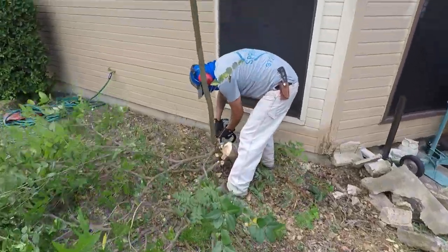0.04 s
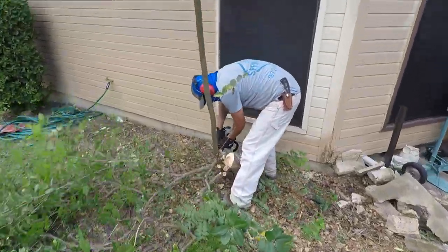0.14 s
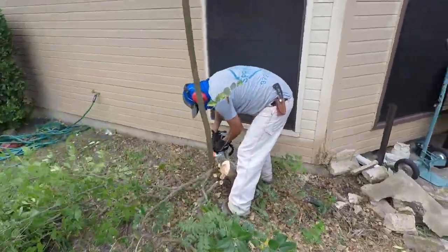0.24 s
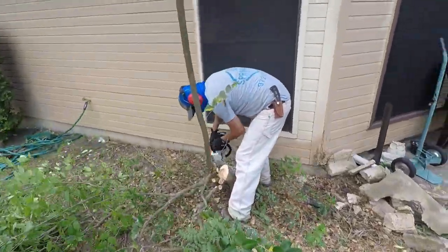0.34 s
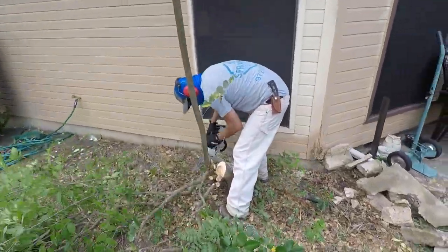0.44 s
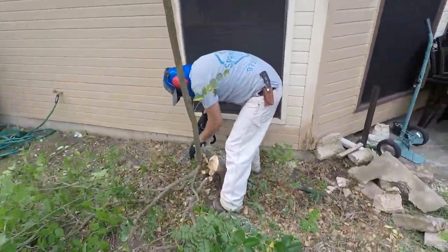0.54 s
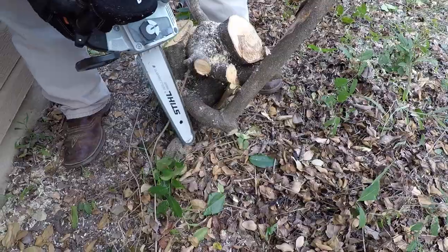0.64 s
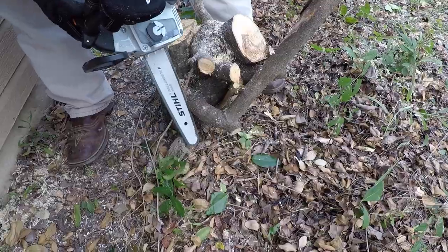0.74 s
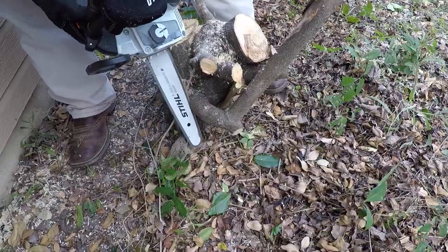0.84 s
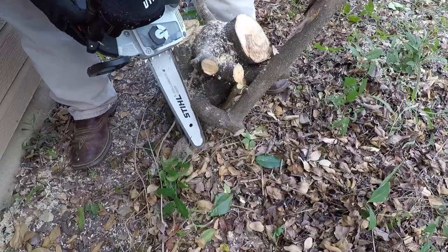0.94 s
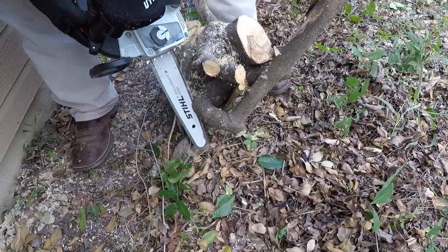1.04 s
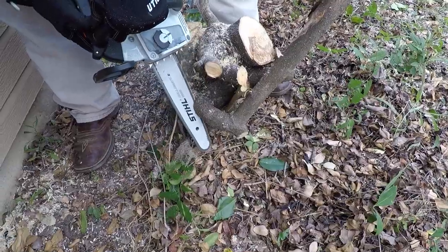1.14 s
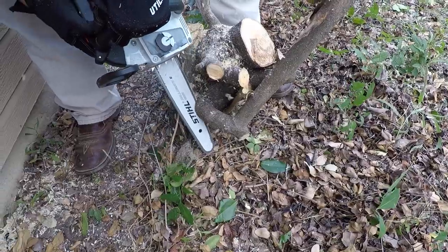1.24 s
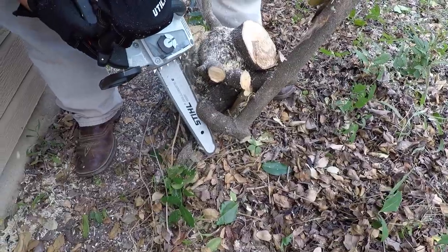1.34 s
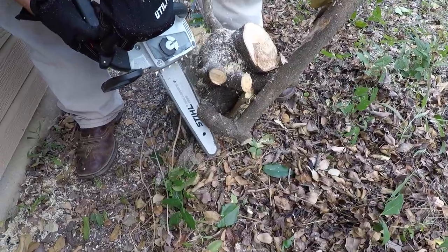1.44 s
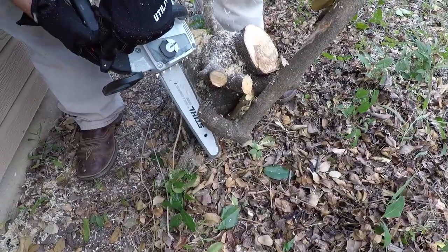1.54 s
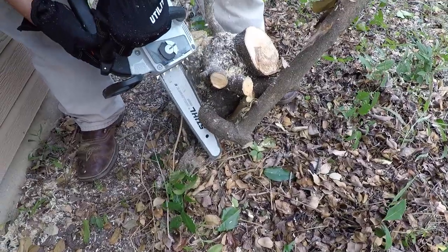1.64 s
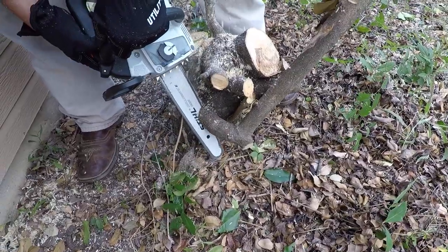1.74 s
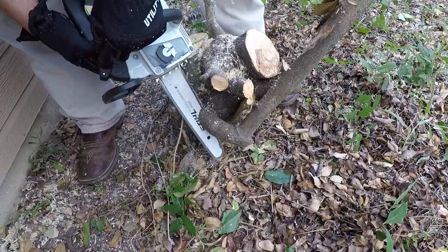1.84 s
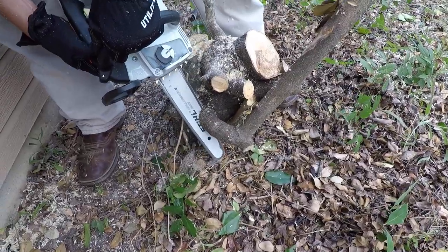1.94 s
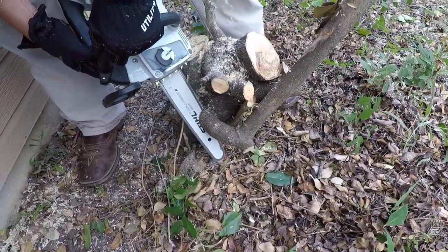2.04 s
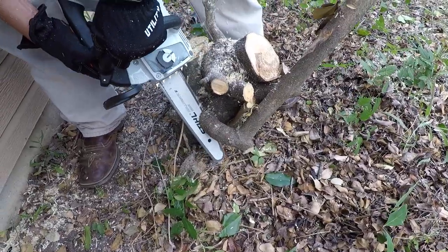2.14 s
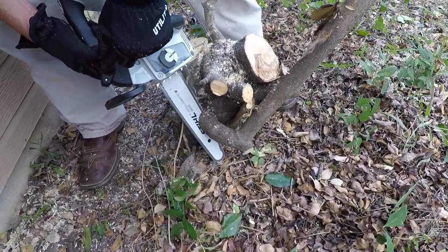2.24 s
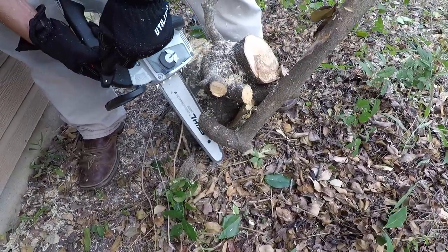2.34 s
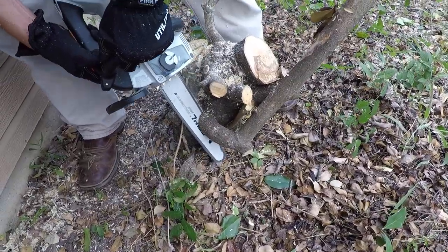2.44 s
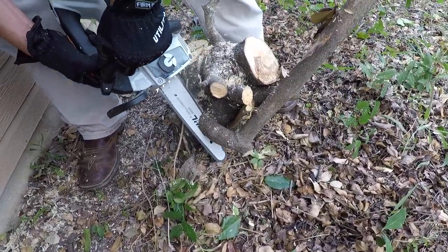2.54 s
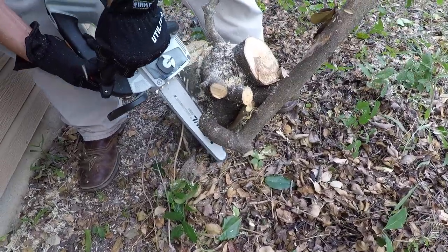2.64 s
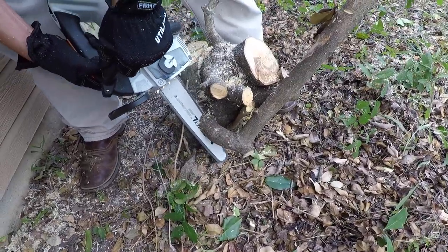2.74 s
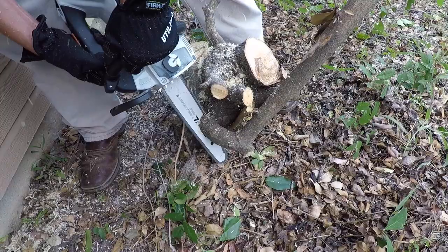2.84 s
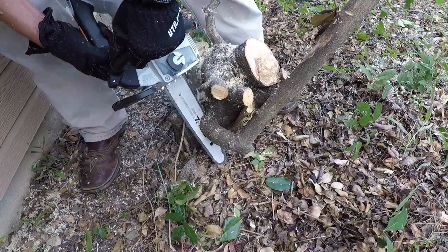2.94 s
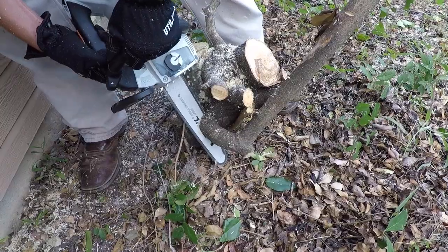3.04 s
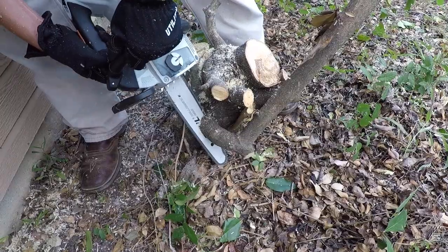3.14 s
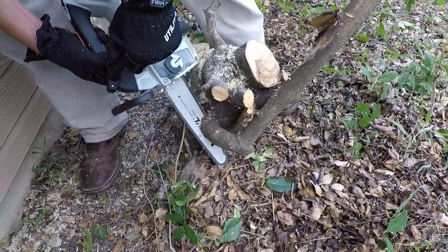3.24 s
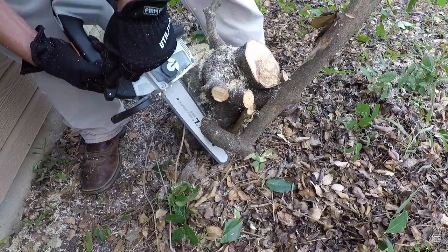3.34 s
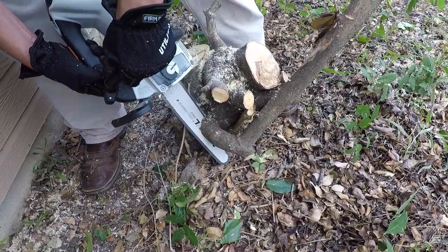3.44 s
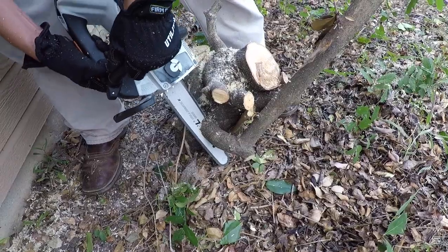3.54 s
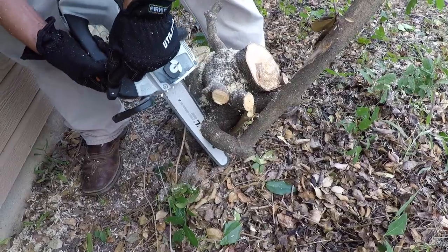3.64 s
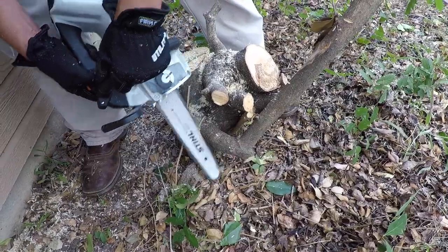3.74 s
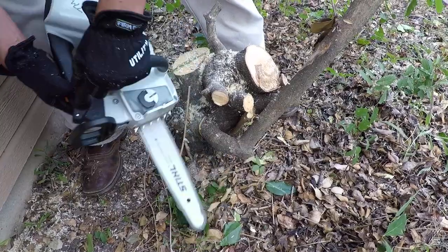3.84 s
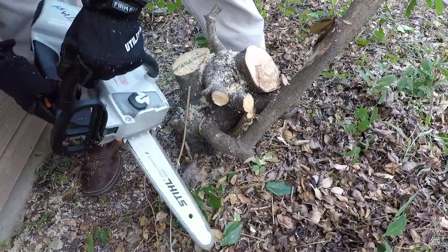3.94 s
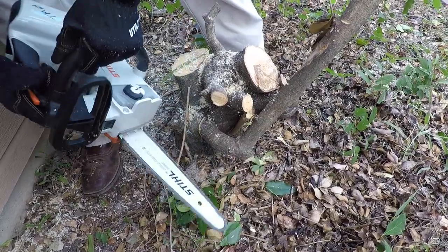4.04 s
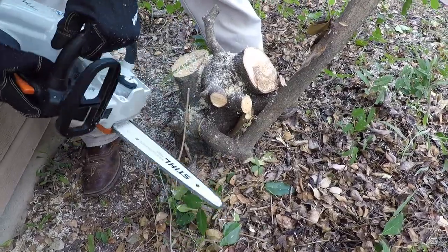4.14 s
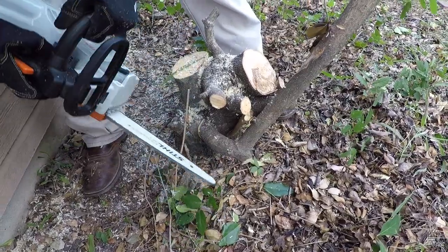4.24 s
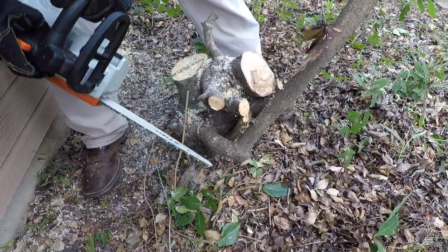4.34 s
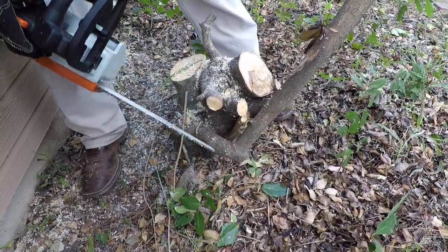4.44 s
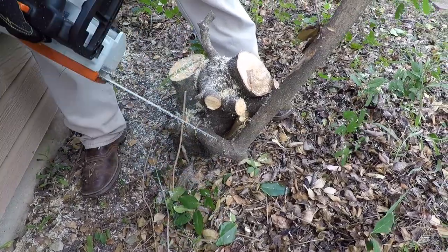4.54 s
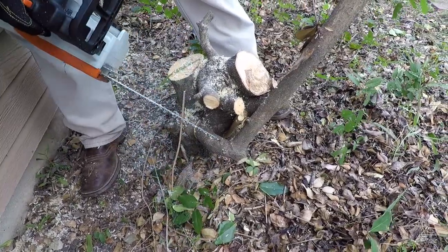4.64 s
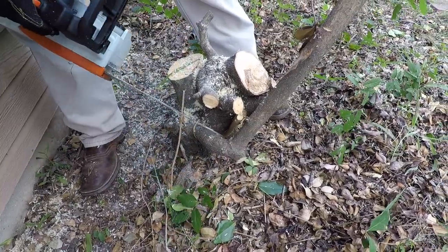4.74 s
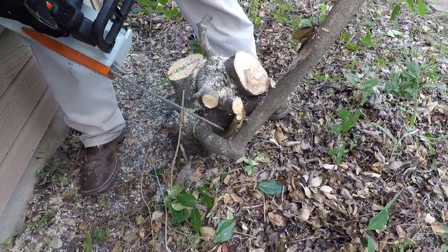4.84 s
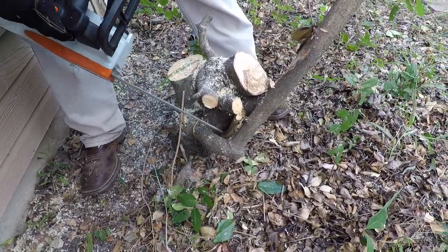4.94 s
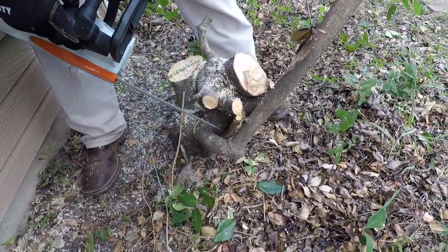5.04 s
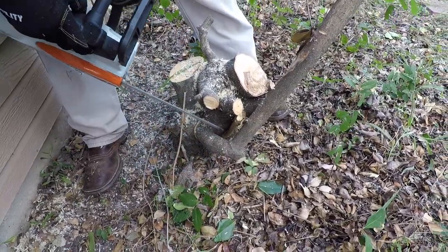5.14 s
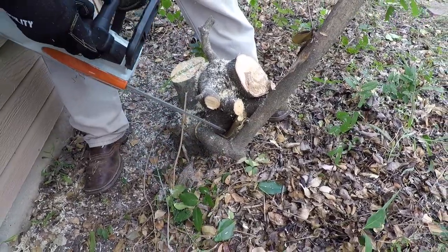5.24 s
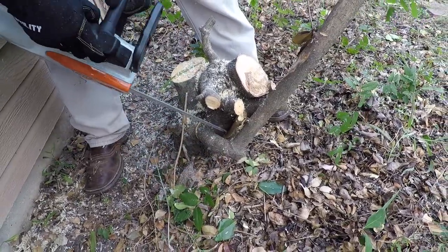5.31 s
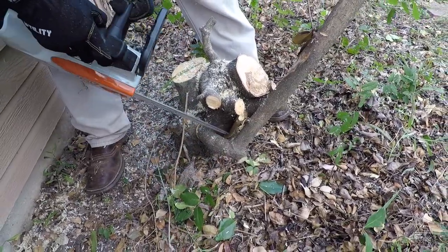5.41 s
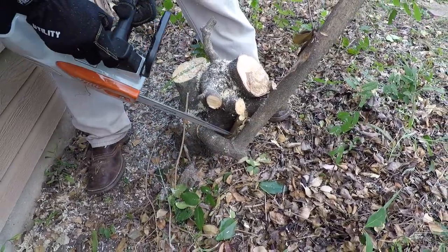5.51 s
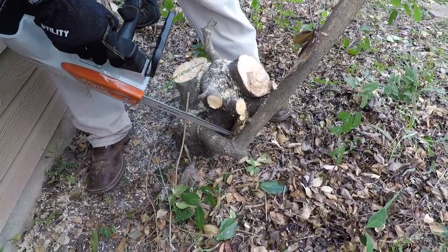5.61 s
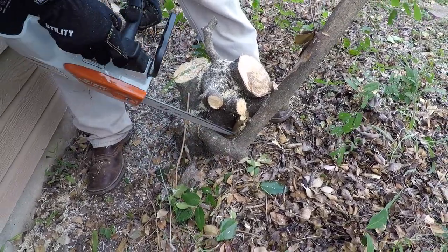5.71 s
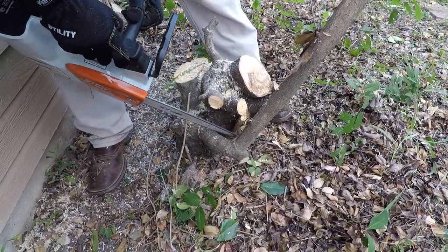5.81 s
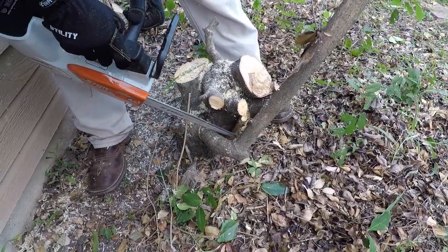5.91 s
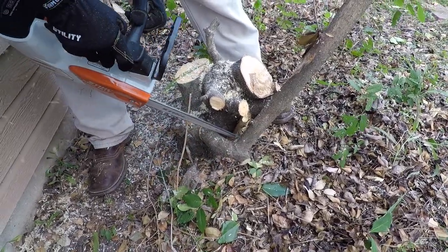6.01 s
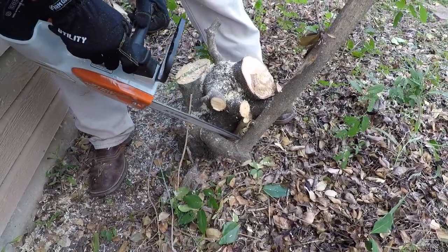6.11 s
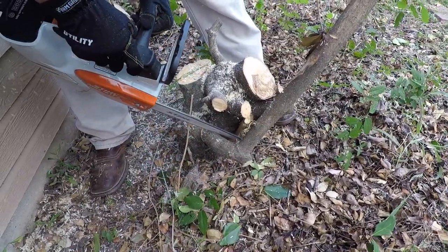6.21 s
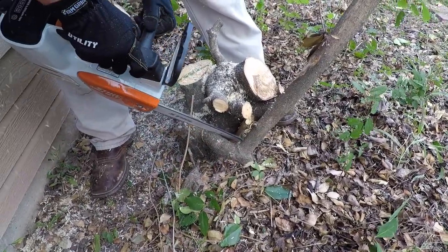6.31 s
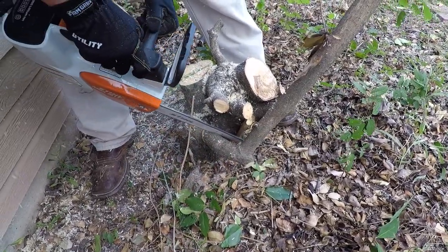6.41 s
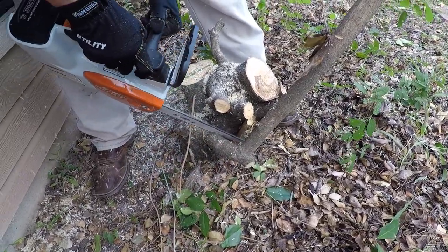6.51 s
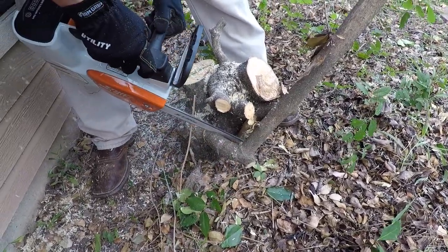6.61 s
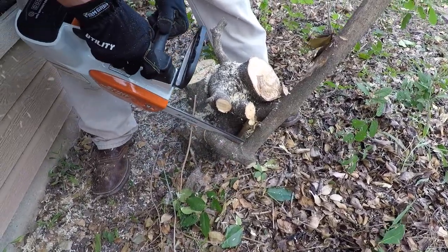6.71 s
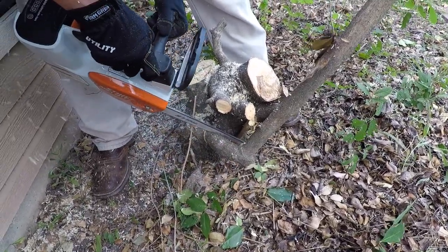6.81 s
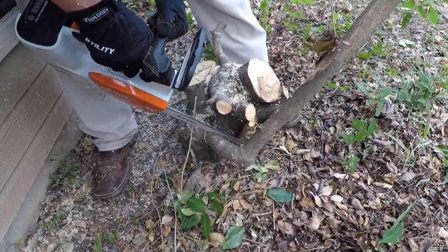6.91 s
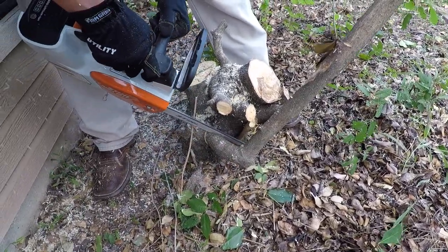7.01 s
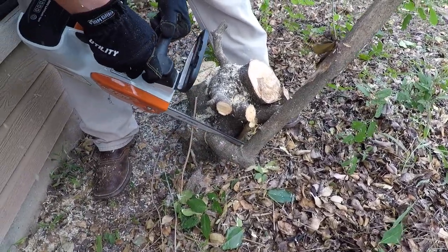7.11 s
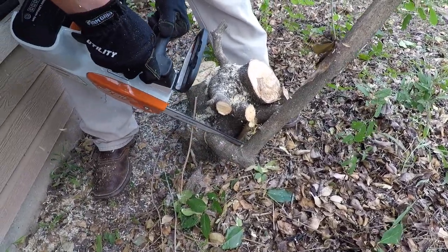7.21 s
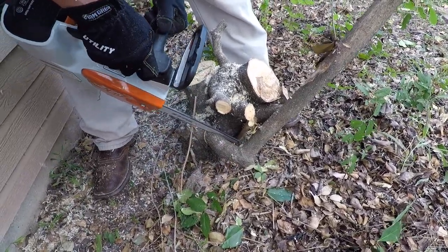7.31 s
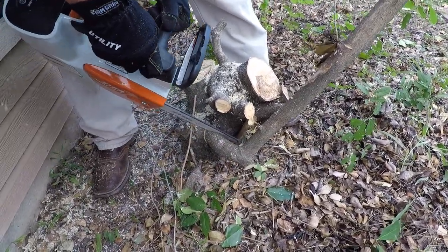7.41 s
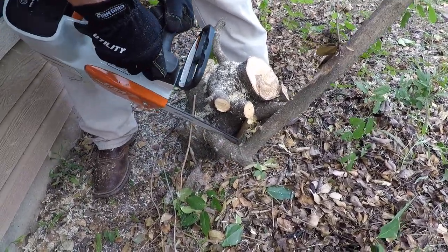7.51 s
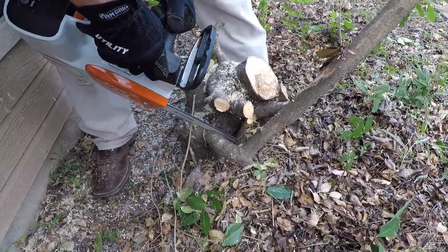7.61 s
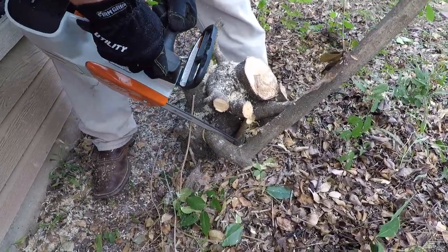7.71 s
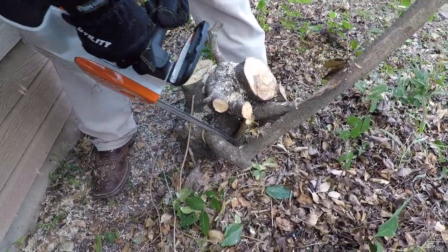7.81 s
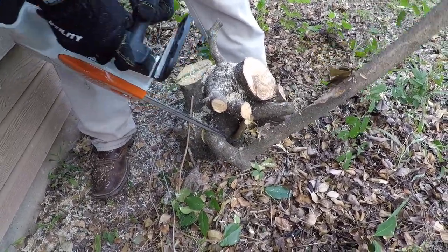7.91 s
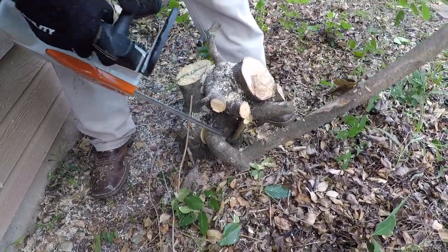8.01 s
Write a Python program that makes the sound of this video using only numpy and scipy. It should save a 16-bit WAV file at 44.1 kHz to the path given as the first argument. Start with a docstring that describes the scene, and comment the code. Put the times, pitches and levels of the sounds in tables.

```python
"""A battery chainsaw cuts wood in a yard, in mono. Three runs: the end of a cut a few metres off in a
breeze, then close by a cut with the bar upright and, after a pause, one with the saw on its side.
An eight-tooth sprocket whines; chain and cutters chatter through housing, bar and wood, with brief
squeals, growls and a low drumming of the wood. Brake, trigger and twigs tick, wood thumps on the ground.
Behind it: a distant wash, insects and machinery hum."""
import sys
import numpy as np
from scipy import signal
from scipy.fft import rfft, irfft
from scipy.io import wavfile
from scipy.ndimage import uniform_filter1d

SR = 44100
rng = np.random.default_rng(int(sys.argv[2]) if len(sys.argv) > 2 else 0)


def generate_wav(sig):
    """Save sig (samples, or channels by samples) to the path in sys.argv[1] as 16-bit PCM at SR."""
    pcm = np.round(np.clip(np.atleast_2d(sig).T, -1, 1) * 32767).astype(np.int16)
    wavfile.write(sys.argv[1], SR, pcm)


N = 355446


def gain_of(db):
    """dB to gain."""
    return 10 ** (np.asarray(db) / 20)


def unit_rms(x):
    """Scale to rms 1."""
    return x / np.sqrt(np.mean(x ** 2) + 1e-20)


def spectrum_db(points, hz):
    """Spectrum table interpolated over log frequency."""
    f, db = np.transpose(points)
    return np.interp(np.log(hz + 1), np.log(f + 1), db)


def follow(rows, t):
    """Columns of a curve table at times t."""
    times, *columns = np.transpose(rows)
    return [np.interp(t, times, column) for column in columns]


def add(mix, start_s, sound):
    """Mix a sound in at start_s."""
    part = mix[max(round(start_s * SR), 0):][:len(sound)]
    part += sound[:len(part)]


def wander(count, hz):
    """Smooth random curve up to about hz, rms 1."""
    lowpass = signal.butter(2, hz, fs=SR, output="sos")
    return unit_rms(signal.sosfilt(lowpass, rng.standard_normal(count + SR))[SR:])


def noise_band(hz, width_hz, db, count=N):
    """Band-passed noise at rms level db."""
    sos = signal.butter(3, (hz - width_hz / 2, hz + width_hz / 2), "bandpass", fs=SR, output="sos")
    return gain_of(db) * unit_rms(signal.sosfilt(sos, rng.standard_normal(count + SR // 4)))[-count:]


def coloured(x, db_of, size=512):
    """Weight the short-time spectrum by db_of(f/Hz, t/s)."""
    frames = dict(fs=SR, nperseg=size, noverlap=size - size // 4)
    hz, t, spectrum = signal.stft(x, **frames)
    return signal.istft(spectrum * gain_of(db_of(hz[:, None], t)), **frames)[1][:len(x)]


# f/Hz, relative level/dB
WASH_SPECTRUM = [(30, -14), (60, 1.5), (150, -10), (220, -11), (450, -9), (700, -6.5), (1200, -18),
                 (4000, -23.5), (8200, -24), (11500, -31), (15500, -36)]


def wash(db=-51):
    """Steady distant noise, mostly low."""
    noise = coloured(rng.standard_normal(N), lambda hz, s: spectrum_db(WASH_SPECTRUM, hz), size=2048)
    return gain_of(db) * unit_rms(noise)


def insects():
    """Far insects: one high band of noise."""
    return noise_band(hz=9750, width_hz=780, db=-54)


# f/Hz, start/s, end/s, level/dB
HUM_TONES = [(77.8, .7, 1.6, -59), (77.8, 3.3, 5.4, -55), (77.8, 4.5, 5.0, -53), (127.6, 1.4, 3.9, -56),
             (175.7, 0, .6, -52), (175.7, .85, 1.65, -52), (234, .65, 1.4, -55), (174.5, 5.6, 6.75, -51),
             (252, 5.5, 6.5, -52), (232.8, 5.9, 6.7, -54)]


def machinery_hum(t, fade_s=0.06):
    """Distant machinery: wavering tones that come and go."""
    out = np.zeros(N)
    for hz, start, end, db in HUM_TONES:
        fade = np.clip(np.minimum(t - start, end - t) / fade_s, 0, 1)
        out += gain_of(db + 1.5 * wander(N, 4.2)) * fade * np.sin(2 * np.pi * hz * t)
    return out


# t/s, level/dB
BREEZE_LEVEL = [(0, -14), (.25, -22.5), (.516, -10), (.6, -19), (.61, -35), (1.1, -49.5), (4.2, -36),
                (5.5, -47.5), (6.2, -36), (7.3, -45), (8.06, -44)]


def breeze(t):
    """Pressure sway near 10 Hz on the microphone, strong in the far run, faint close by."""
    hz = np.fft.rfftfreq(N, 1 / SR)
    sway = irfft(rfft(rng.standard_normal(N)) * (hz / 9) / (1 + (hz / 11) ** 7.7), N)
    return gain_of(follow(BREEZE_LEVEL, t)[0]) * unit_rms(sway)


# t/s, level/dB, f/Hz
WOOD_THUMPS = [(3.145, -37, 90), (7.95, -37, 217)]


def thumps():
    """Wood knocks softly on the ground: one low push each."""
    out, t = np.zeros(N), np.arange(3000) / SR
    envelope = np.e * t / 0.0041 * np.exp(-t / 0.0061)
    for start, db, hz in WOOD_THUMPS:
        add(out, start, gain_of(db) * envelope * np.sin(2 * np.pi * hz * t))
    return out


# t/s, level/dB, f/Hz, t60/s, crack share
TICK_EVENTS = [(0.291, -5, 2700, .03, 0.54), (4.0528, 0, 3000, .008, .1), (4.0526, -6, 3700, .008, .2),
               (4.0542, -9, 2200, .025, .3), (4.049, -8.5, 1200, 0.027, 0.52),
               (4.246, -18, 9000, 0.018, 0.95), (4.288, -36, 1508, .05, 0.71),
               (4.39, -50, 13000, .01, 0.65), (4.417, -54, 7000, .02, .8), (4.44, -45, 13000, .01, .8),
               (4.4538, -21, 4430, .03, 0.68), (4.4574, -11.5, 7860, 0.019, 0.75),
               (4.57, -26.5, 10000, 0.013, 1), (4.6465, -29, 6100, 0.036, .3),
               (4.682, -14, 2800, 0.05, 0.51), (4.733, -4.5, 2940, .03, 0.49), (4.787, -5, 2500, .03, 0.36),
               (6.576, -4, 3550, 0.033, 0.98), (6.592, -14, 3700, .03, .9), (6.644, -7, 3020, 0.029, 1)]


def ticks(attack_s=0.00024):
    """Brake, trigger and twigs: a short ring of plastic or wood with a crack of noise."""
    out, t = np.zeros(N), np.arange(3000) / SR
    for start, db, hz, t60, share in TICK_EVENTS:
        sos = signal.butter(1, (hz / 10, min(hz * 2.1, 19000)), "bandpass", fs=SR, output="sos")
        crack = 0.5 * unit_rms(signal.sosfilt(sos, rng.standard_normal(len(t))))
        ring = np.sin(2 * np.pi * hz * t)
        envelope = gain_of(db - 60 * t / t60) * np.minimum(t / attack_s, 1)
        add(out, start, envelope * ((1 - share) * ring + share * crack))
    return out


# start/s, end/s, f/Hz, width/Hz, level/dB
RESONANCE_SPELLS = [(0.217, .24, 580, 60, -27), (0.229, 0.295, 1530, 90, -27),
                    (0.367, 0.492, 940, 110, -30.5), (0.431, 0.474, 590, 60, -30),
                    (0.61, 1.15, 3740, 140, -36), (1.6, 1.9, 696, 90, -39), (2.05, 2.33, 667, 110, -32.5),
                    (2.28, 2.47, 5960, 700, -25), (2.44, 2.822, 4560, 150, -30),
                    (3.252, 3.75, 4480, 170, -30), (3.851, 4.02, 5220, 260, -31),
                    (3.882, 4.02, 683, 70, -26), (4.07, 4.12, 1550, 100, -28.5),
                    (4.682, 4.736, 1030, 200, -23.5), (4.692, 4.837, 2920, 180, -24),
                    (4.797, 4.963, 3520, 160, -28), (5.15, 5.6, 5330, 250, -38), (5.6, 6.75, 201, 110, -48),
                    (4.7, 5.2, 398, 110, -39), (7.15, 7.6, 11700, 900, -35)]


def resonances():
    """Brief narrow noise bands: high squeals of bar or housing, growls, low drumming of the wood."""
    out = np.zeros(N)
    for start, end, hz, width_hz, db in RESONANCE_SPELLS:
        t = np.arange(start, end, 1 / SR)
        fade = np.clip(np.minimum(t - start, end - t) / (0.18 * (end - start)), 0, 1)
        add(out, start, fade * noise_band(hz, width_hz, db, len(t)))
    return out


# Per-run order throughout: far, upright, on its side.
TEETH, START_S, SPIN_UP_S = 8, 4.683, .12
RELEASE_S, BRAKE_ONSET_S = (.19, 3.95, 7.865), (.01, .04, .008)
BRAKE_HZ_PER_S = (1200, 1900, 3100)
# per run: t/s, tooth rate under power/Hz
POWERED_RATE = [
    [(0, 663), (.12, 650), (.19, 637)],
    [(.62, 623), (.9, 631), (1.05, 629), (1.6, 640), (1.78, 653), (1.92, 641), (2.06, 640), (2.16, 626),
     (2.22, 639), (2.31, 639), (2.39, 597), (2.48, 643), (2.6, 651), (2.67, 638), (2.82, 632), (2.9, 650),
     (3.17, 641), (3.28, 630), (3.45, 638), (3.96, 637)],
    [(4.68, 635), (5.5, 633), (5.9, 629), (6.05, 633), (6.62, 630), (6.8, 653), (7.0, 647), (7.12, 637),
     (7.23, 637), (7.38, 609), (7.55, 655), (7.66, 659), (7.76, 649), (7.86, 626)],
]


def tooth_hz(run, t):
    """Sprocket tooth rate: the last run spins up from rest; each brakes on trigger release."""
    powered = follow(POWERED_RATE[run], t)[0]
    if run == 2:
        powered *= 1 - np.exp(-np.maximum(t - START_S, 0) / SPIN_UP_S)
    released_s = np.maximum(t - RELEASE_S[run], 0)
    braked_s = released_s - BRAKE_ONSET_S[run] * (1 - np.exp(-released_s / BRAKE_ONSET_S[run]))
    return np.maximum(powered - BRAKE_HZ_PER_S[run] * braked_s, 0)


def shaft_angle(run, t):
    """Shaft angle/rad; the speed trembles as cutters bite, more while the chain runs slack."""
    rate_hz = tooth_hz(run, t)
    slack = np.clip(1 - rate_hz / 620, 0, 1)
    tremble = ((.002, .00401, .002)[run] + .015 * slack) * wander(len(t), 41)
    return 2 * np.pi * np.cumsum(rate_hz * (1 + tremble)) / SR / TEETH


# t/s, beat depth in the chatter/dB
BITE_DEPTH = [(0, 0), (.6, 0.5), (2, 0.5), (4, 0.5), (4.8, .5), (5.6, 0.5), (6.2, 1), (6.55, 2), (6.75, 0),
              (7.9, .5)]


def cutter_beat_db(t, angle):
    """Cutters meet the wood about three times in four shaft turns."""
    return follow(BITE_DEPTH, t)[0] * np.cos(.745 * angle + 0.3 * wander(len(t), 8))


# per run: t/s, level/dB; first and last rows bound the run
CHATTER_LEVEL = [
    [(0, -20), (.2, -18.5), (.36, -20), (.42, -24), (.5, -35.5), (.53, -42.5), (.596, -39)],
    [(.6, -17), (1.4, -15.5), (1.6, -16), (2.0, -16.5), (2.4, -17), (2.6, -17.5), (2.8, -17), (3.0, -17.5),
     (3.8, -16.5), (4.08, -19.5), (4.16, -23.5), (4.24, -28.5), (4.275, -59), (4.3, -49), (4.33, -67),
     (4.36, -72)],
    [(4.645, -36), (4.67, -37), (4.7, -21.5), (4.73, -17), (4.8, -14.5), (4.86, -16.5), (5.2, -18),
     (5.5, -17.5), (6.6, -17), (7.0, -19), (7.2, -17.5), (7.6, -19), (7.87, -16), (7.93, -19),
     (7.953, -21.5), (7.965, -29.5), (8.03, -32.5), (8.06, -38)],
]


def chatter_level(run, t, working_db=-17.5):
    """Chatter gain, and its fall/dB below the working level."""
    db = follow(CHATTER_LEVEL[run], t)[0]
    return gain_of(db), np.maximum(working_db - db, 0)


# chatter spectra: f/Hz, relative level/dB
FAR_SPECTRUM = [(59, -51), (100, -21), (326, -29), (601, -2.5), (1460, -9.5), (2630, -5.5), (2990, -9),
                (7100, -13), (8400, -8.5), (10600, -19.5), (13600, -12.5), (15500, -18.5)]
UPRIGHT_SPECTRUM = [(59, -49), (100, -27.5), (530, -13.5), (627, -5), (1340, -9), (2520, -2.5),
                    (3050, -6.5), (5390, -6), (6950, -10), (8230, -5.5), (10800, -15), (14200, -9),
                    (15500, -17.5)]
SIDE_SPECTRUM = [(59, -75), (100, -30.5), (386, -17), (552, -18), (654, -3.5), (860, -12.5), (1260, -2.5),
                 (1430, -2.5), (2470, -3.5), (4560, -7.5), (8050, -8.5), (14500, -17), (15500, -11.5)]
# rings and dead spots: f/Hz, width/Hz, boost/dB for each run
BODY_RINGS = [(321, 57, -2, -7, -7), (393, 202, 12.5, 8.5, 9.5), (680, 310, -4.5, -1, -4.5),
              (940, 280, 2.5, -2, 3.5), (1100, 41, -4, 4.5, 1), (1253, 46, -5, -5.5, 3),
              (2235, 410, -1, 4, 3), (3140, 170, -3, -1, 0.5), (3540, 152, -3, 1, 2.5),
              (4230, 250, -3, -5, -0.5), (4210, 210, -4, 4, 0), (5380, 500, 0.5, 1, 2),
              (8300, 1900, 1, 3.5, 6), (13550, 2300, -2.5, -3, 7)]


def body_db(run, hz):
    """Steady colour of a run: broad spectrum plus housing and bar resonances."""
    rings_db = sum(boosts[run] / (1 + (2 * (hz - centre) / width) ** 2)
                   for centre, width, *boosts in BODY_RINGS)
    return spectrum_db((FAR_SPECTRUM, UPRIGHT_SPECTRUM, SIDE_SPECTRUM)[run], hz) + rings_db


# wood rumble, wood body, chain rasp, bar ring, cutter ring, treble: low/Hz, high/Hz
BANDS = [(130, 346), (290, 1150), (1150, 3800), (4350, 4800), (7600, 10050), (10300, 20000)]
# per band: share of the chatter's fall added back; low bands fade last
BAND_LINGER = (0.67, 0.19, 0.16, -0.056, -0.15, -0.063)
# per run: t/s, boost/dB of wood rumble, wood body, bar ring, cutter ring
BAND_DRIFT = [
    [(0, -7, -3, 0, -1), (.3, -6, -1, 1, -2.2), (.47, 5, 3.5, 1, -1), (.6, 15, -3, 0, 1)],
    [(.6, 2, 3, 0, -0.5), (.8, 4.5, 0.5, -1, -0.5), (1.4, 2, 0.5, -6, -3), (1.7, -3, 0.5, -1, -2.5),
     (2.4, 1, 0, 1.5, -3), (3.2, -0.5, 2.5, 1, -2.5), (3.8, -0.5, 1, -5, -2.5), (4.05, 0, 3.5, 1, 0),
     (4.16, -10, 6, -5, -0.5), (4.25, 4, 7, -6, -4)],
    [(4.65, 1, 14.5, 4, -5), (4.75, 0, 5.5, 10, 2.5), (4.9, 8, -1.5, -1, -0.5), (5.2, 1, 3, -1, -0.5),
     (5.5, 3.5, 1, -3, 4), (5.85, 3, 1, 1, 4.5), (6.2, 5, 3, -1, -1.5), (6.6, 7, 2, -1.5, 1),
     (6.85, 1.5, -0.5, -10, 0.5), (7.3, 2, -0.5, -4, -1.5), (7.8, -4.5, -1.5, 1, -1.5),
     (7.88, -1, -9, -6, 3), (7.95, 1, 7, 0, -1)],
]
# t/s, boost/dB of chain rasp, treble
RASP_DRIFT = [(0, -1, 0.5), (.59, 0, 0), (.61, 0.5, 0.5), (1.5, -1, -0.5), (2.6, 0, -0.5), (3.6, 1, -0.5),
              (4.1, -1.5, 0), (4.7, 0.5, -2), (5.2, 1.5, -3), (5.8, -1, 0.5), (6.5, 0.5, 0.5), (7.2, 0, 0),
              (7.85, -1, 3), (7.97, 1, -2)]


def drift_db(run, hz, t):
    """Bands swell and fade through the cut; small patches of spectrum drift at random."""
    patches = uniform_filter1d(rng.standard_normal((len(hz), len(t))), size=2, axis=0)
    patches = uniform_filter1d(patches, size=40, axis=1)
    rumble, body, bar, cutter = follow(BAND_DRIFT[run], t)
    rasp, treble = follow(RASP_DRIFT, t)
    _, fall_db = chatter_level(run, t)
    boosts = np.array([rumble, body, rasp, bar, cutter, treble]) + np.outer(BAND_LINGER, fall_db)
    bands_db = sum(db / (1 + (hz / high) ** 24 + (low / (hz + 1)) ** 24)
                   for (low, high), db in zip(BANDS, boosts))
    return 1.15 * unit_rms(patches) + bands_db


# shaft order, level/dB re chatter for each run
SHAFT_TONES = [(3.9, -33, -42, -34.5), (7.21, -45, -35, -34), (8.93, -19, -19.5, -29.5),
               (12.06, -36, -39, -26), (14.75, -28, -27, -21), (17.4, -28, -41, -29),
               (30.5, -31, -18.5, -16), (56, -32, -26, -24), (56.9, -30, -21.5, -43),
               (58.3, -30, -16.5, -32)]


def chatter(run, t, angle, beat_db, chips_per_s=2500):
    """Scrape and chip clicks, pulsed by teeth, shaft and cutters, in the saw's colour; weak shaft tones."""
    n = len(t)
    chips = (rng.random(n) < chips_per_s / SR) * gain_of(3.7 * np.minimum(rng.exponential(1, n), 3.5))
    drive = rng.standard_normal(n) + 0.45 * unit_rms(chips * rng.choice([-1., 1.], n))
    faults = rng.standard_normal(400)  # sprocket flaws, repeating every turn
    turning = np.clip(tooth_hz(run, t) / 600, 0, 1) ** 3
    drive += 0.25 * turning * np.interp(angle / (2 * np.pi) % 1, np.linspace(0, 1, len(faults)), faults)
    pulse_db = 0.38 * np.cos(TEETH * angle) + .5 * np.cos(angle) + beat_db + 0.77 * wander(n, 124)
    scrape = unit_rms(coloured(drive * gain_of(pulse_db), lambda hz, s: body_db(run, hz), size=2048))
    scrape = coloured(scrape, lambda hz, s: drift_db(run, hz, s + t[0]))
    tones = sum(gain_of(levels[run] + 2.5 * wander(n, 3)) * np.cos(order * angle)
                for order, *levels in SHAFT_TONES)
    gain, _ = chatter_level(run, t)
    return gain * (scrape + turning * tones)


HARMONICS, COAST_DB = (1, 2, 3, 4, 6, 8), (-9.5, -10, -8)
# per run: base level/dB of each tooth-rate harmonic
WHINE_LEVELS = [(-34, -41, -35, -21.5, -33, -38), (-35, -41.5, -32, -28.5, -35, -38),
                (-38.5, -25, -36, -23.5, -34.5, -40.5)]
# per run, as the bar sinks in: t/s, boost/dB of each harmonic
WHINE_SHIFTS = [
    [(0, 0, 0, 0, 0, 0, -5), (.2, 2, 2, 0, 0, 0.0096, 10)],
    [(.6, 5, 3, 8.5, -14, 3, 3), (.7, 0, 2, 1, -12, 2, 3), (.88, -9, 6, 0, 1, -2, 0),
     (1.1, 0, 7, -6, 0, 2, -2), (1.55, -11, -2, -6, 0, -5, 3), (1.8, -1, 7, 0.5, 1, -5, 9),
     (2.2, 3.5, -2, 0, -0.5, 0, 2), (2.43, -3, -4, -7, 3.5, 2, 2), (2.65, 6, -4, -5, -4, 3, -2),
     (2.8, -1, 3, -2, 0, 0, -3), (2.9, 4, 0, 1, -1, 5, 0), (3.03, 1, 10, 2.5, 1.5, 10, 0),
     (3.35, 0.5, -3, 1, -1.5, -8, 0), (3.75, -0.5, -4, 6.5, 3.5, 6, -2), (3.95, 3.5, 9, -8, 1, 4, 12),
     (4.07, -4, 20, 13, 3, 4, 0), (4.2, -10, 10, -5, 8, 18, 0)],
    [(4.73, -12, -10, -2, -1, -6, -2), (4.79, -4, -17, -6, -18, 4, 8), (4.84, -5, 4, -8, -9, 17, 8),
     (4.88, 0, -1, -12, 2.5, 10, 2), (4.92, -2, 0, -8, 5, -8, 0), (4.99, 6, -10, -2, 5, 8, 0),
     (5.12, 4, -2, 8, -2.5, 5, 2), (5.4, 2.5, 2, 6, -8, -6, 0), (5.6, 0, -0.5, 2, -10, 3.5, -4),
     (6.2, -1.5, -2.5, 1, -3.5, 5.5, -6), (6.6, -3, -4, -4, -2.5, -5, 0), (6.88, -1, -3.5, 2, 7, 0, -2),
     (7.17, -1.5, -1, 2, 4.5, 2, 6), (7.38, -10, 4.5, 6, 4, 3, 4), (7.58, 5.5, 3.5, -4, 4.5, 4, 0),
     (7.7, -1, -4.5, 4, -1, 0, 4), (7.8, -8, 6.5, 0, 0.5, 0, 13), (7.87, -10, 7, -4, 1, -1, 9),
     (7.92, -12, 8, -6, -2, -2, 0), (7.96, -12, -20, -8, -16, -6, -10)],
]
# per run: flutter of each harmonic, both amplitude share and phase/rad
WHINE_FLUTTER = [(.5, .4, .4, .25, .6, .6), (.4, .15, .3, .4, .45, .7), (.4, .06, .3, .15, .25, .25)]


def whine(run, t, angle, beat_db):
    """Links meet the sprocket: tones that throb once a turn and drop as the teeth stop pulling."""
    tones = np.zeros(len(t))
    shifts = follow(WHINE_SHIFTS[run], t)
    for k, db, shift_db, flutter in zip(HARMONICS, WHINE_LEVELS[run], shifts, WHINE_FLUTTER[run]):
        throb = 1 + 0.091 * np.cos(angle + 2 * np.pi * rng.random()) + flutter * wander(len(t), 38)
        phase = k * TEETH * angle + flutter * wander(len(t), 37)
        tones += gain_of(db + shift_db) * unit_rms(throb) * np.cos(phase)
    moving = np.clip((tooth_hz(run, t) - 80) / 60, 0, 1)
    coasting = np.clip((t - RELEASE_S[run]) / 0.045, 0, 1)
    _, fall_db = chatter_level(run, t)
    return np.sqrt(2) * moving * tones * gain_of(COAST_DB[run] * coasting - fall_db + 0.45 * beat_db)


def chainsaw(fade_in_s=(.003, .008, .002), fade_out_s=.0011):
    """Three motor runs; one shaft drives both whine and chatter."""
    out = np.zeros(N)
    for run, rows in enumerate(CHATTER_LEVEL):
        t = np.arange(round(rows[0][0] * SR), min(round(rows[-1][0] * SR), N)) / SR
        angle = shaft_angle(run, t)
        beat_db = cutter_beat_db(t, angle)
        fade = np.clip(np.minimum((t - t[0]) / fade_in_s[run], (t[-1] - t) / fade_out_s), 0, 1)
        add(out, t[0], fade * (whine(run, t, angle, beat_db) + chatter(run, t, angle, beat_db)))
    return out


def scene():
    """Saw and yard, the same on both channels."""
    t = np.arange(N) / SR
    sawing = chainsaw() + resonances() + ticks() + thumps()
    yard = wash() + breeze(t) + machinery_hum(t) + insects()
    return np.tile(sawing + yard, (2, 1))


def record(dry):
    """Steep low-pass at 15.4 kHz."""
    lowpass = signal.firwin(1023, 15400, window=("kaiser", 10), fs=SR)
    return signal.oaconvolve(dry, lowpass[None], "same")


dry = scene()
out = record(dry)
generate_wav(out)
```